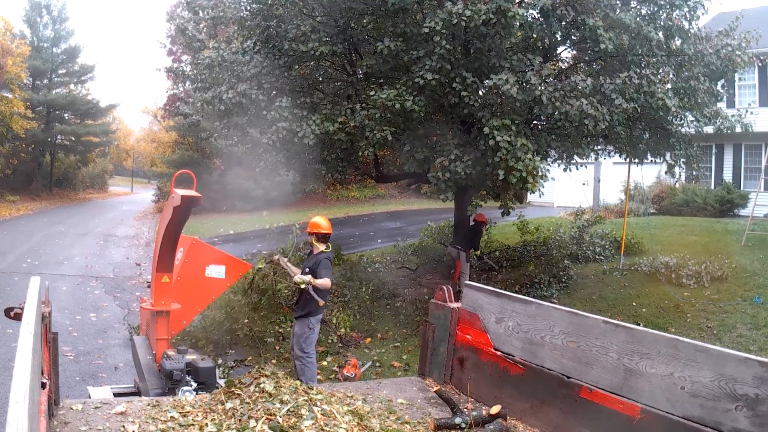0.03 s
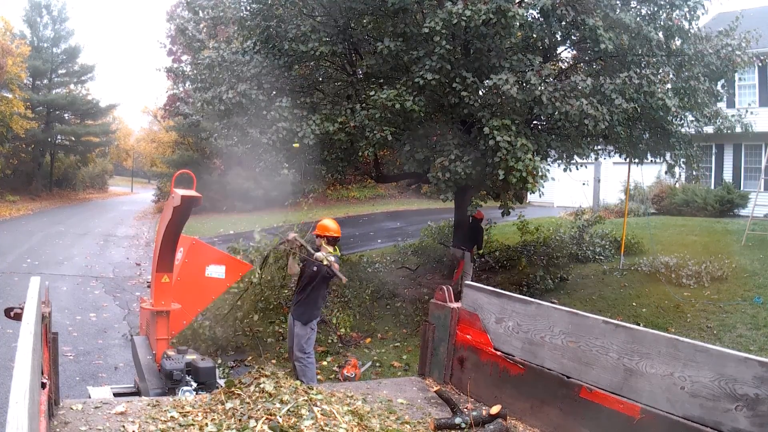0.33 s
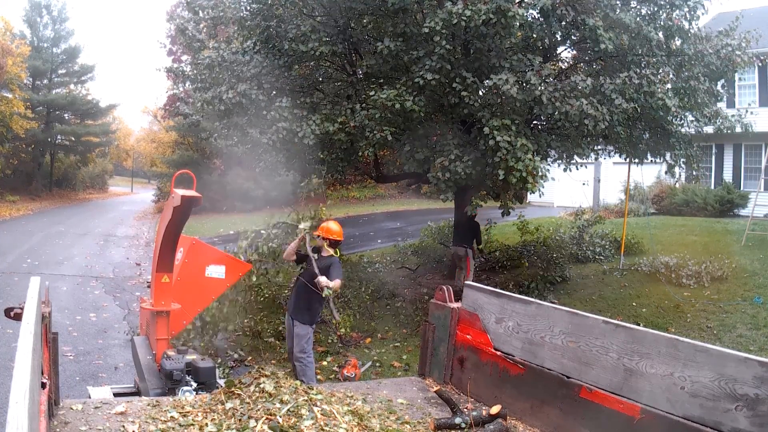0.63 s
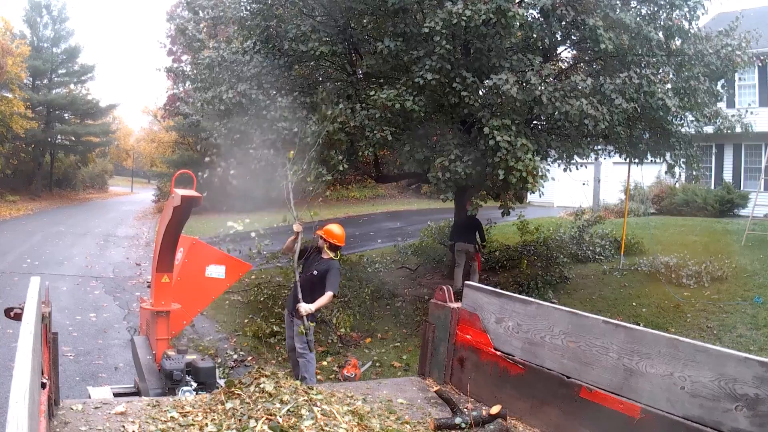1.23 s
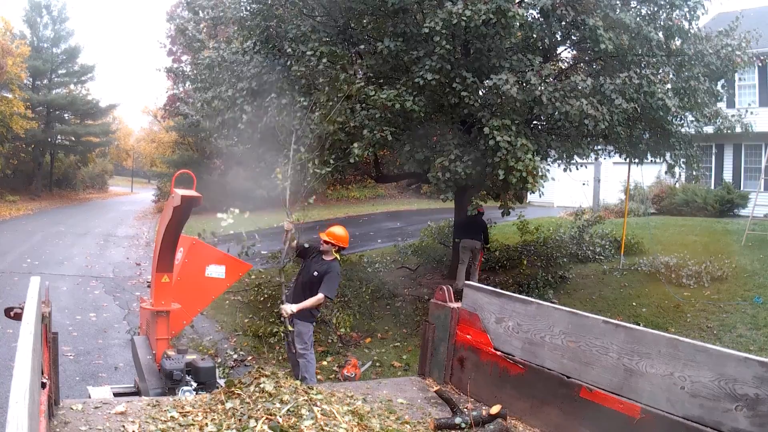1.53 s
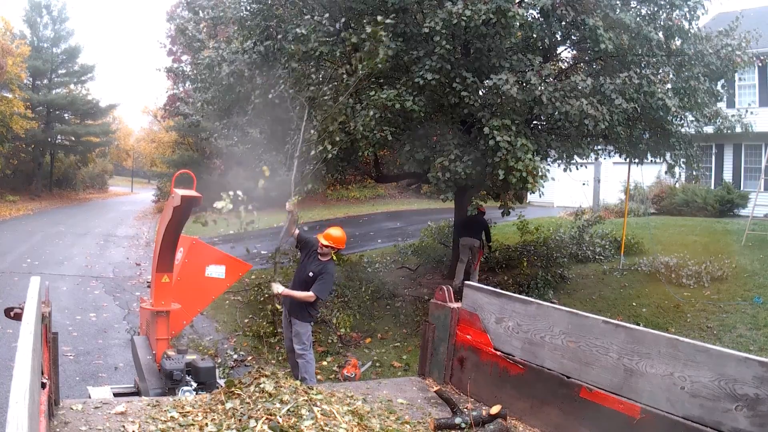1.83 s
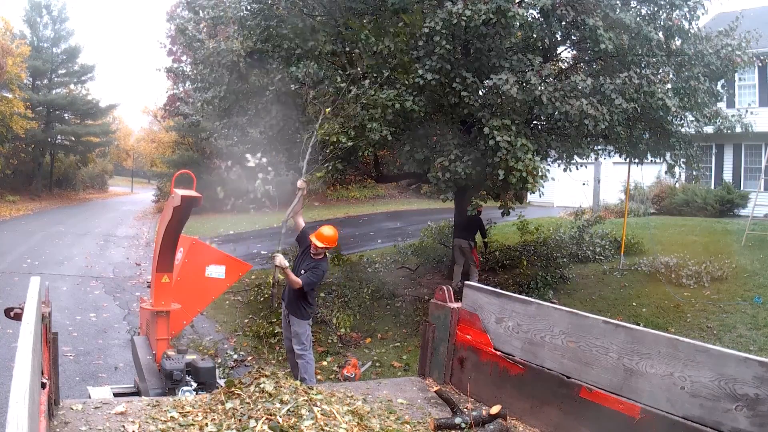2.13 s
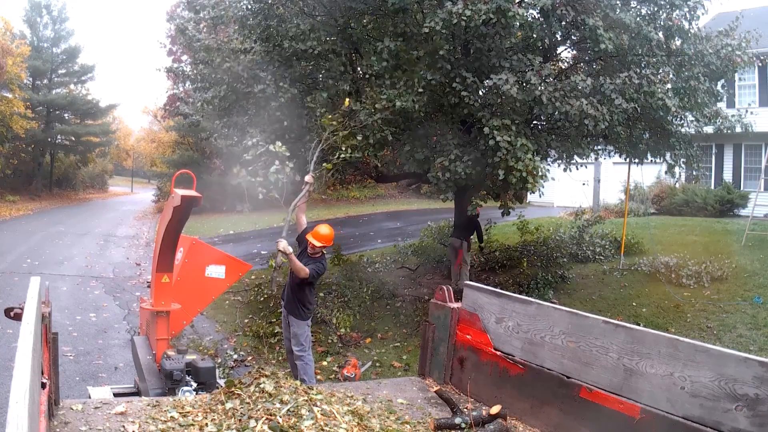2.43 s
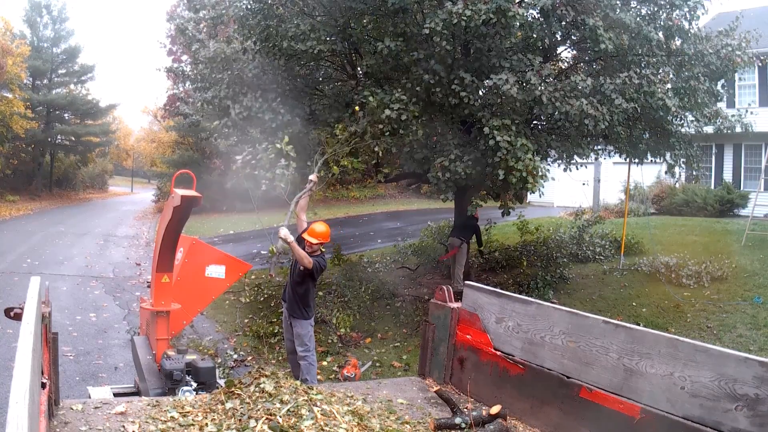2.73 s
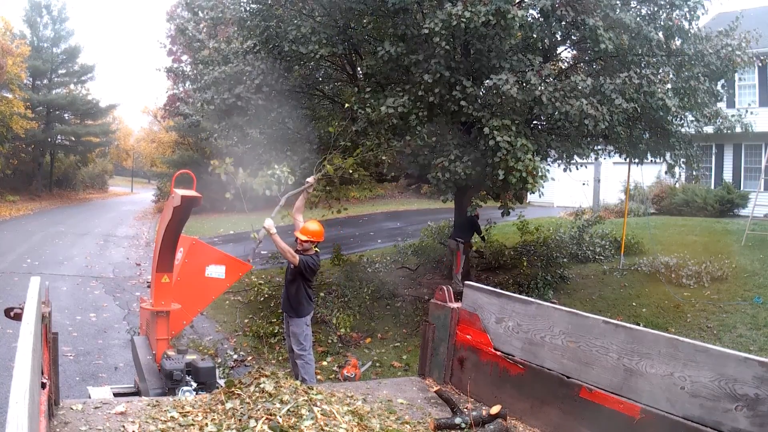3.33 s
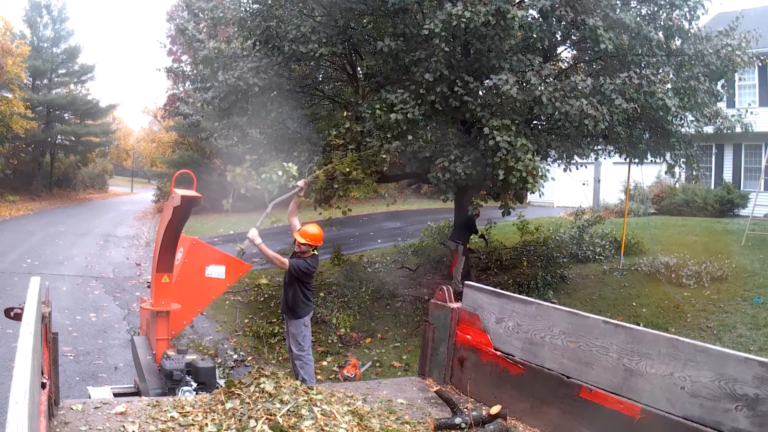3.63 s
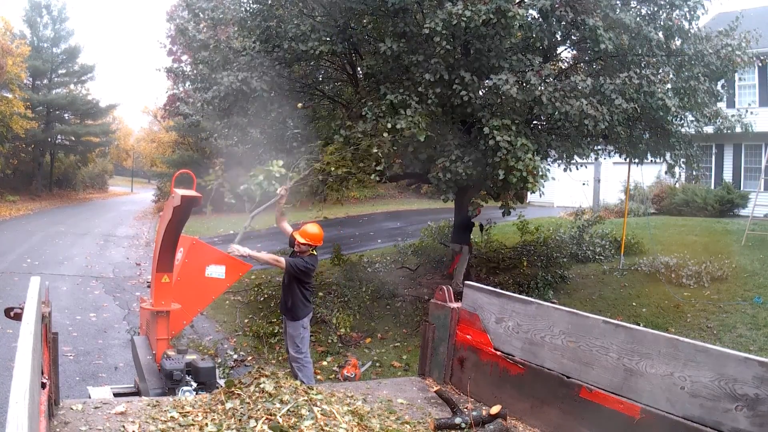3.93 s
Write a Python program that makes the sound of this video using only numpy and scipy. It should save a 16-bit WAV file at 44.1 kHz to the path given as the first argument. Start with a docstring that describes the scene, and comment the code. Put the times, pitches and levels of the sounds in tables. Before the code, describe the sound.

Loud, distorted wood chipper running outdoors, with an even droning tone and engine clatter beneath.

```python
"""A wood chipper's belt-driven rotor drones like a siren, unloaded, a few metres away outdoors.
Its vanes chop the air into tones and blow a roar through the chute. Underneath, the single-cylinder
petrol engine thuds and clatters at governed speed. The sound overloads the microphone,
which clips hard and keeps only a narrow band."""
import sys
import numpy as np
from scipy import signal
from scipy.fft import rfft, irfft, next_fast_len
from scipy.io import wavfile
from scipy.ndimage import map_coordinates

SR = 44100
rng = np.random.default_rng(int(sys.argv[2]) if len(sys.argv) > 2 else 0)


def wav_record(signal):
    """Record a signal, one row per channel, as 16-bit PCM in the file named by sys.argv[1]."""
    frames = np.transpose(np.atleast_2d(signal))
    bounded = np.clip(frames, -1, 1)
    # unit amplitude maps onto the largest positive 16-bit level
    quanta = np.round(bounded * 32767).astype(np.int16)
    wavfile.write(sys.argv[1], SR, quanta)


N = 176400


def amp(db):
    """Decibels to gain."""
    return 10 ** (np.asarray(db) / 20)


def unit(x):
    """Scale to rms 1."""
    return x / np.sqrt(np.mean(x ** 2) + 1e-20)


def eq_gain(curve, hz):
    """Gain of a (freq_hz, level_db) curve, read along a log frequency axis."""
    freq_hz, level_db = np.transpose(curve)
    return amp(np.interp(np.log(hz + 1), np.log(freq_hz + 1), level_db))


def wobble(rate_hz):
    """Smooth random modulation through rate_hz points a second."""
    points = rng.standard_normal(int(N * rate_hz / SR) + 4)
    return map_coordinates(points, [np.arange(N) * rate_hz / SR])


def filtered(x, response):
    """Filter x by a gain given as a function of frequency."""
    size = next_fast_len(N + SR // 2)
    return irfft(rfft(x, size) * response(np.fft.rfftfreq(size, 1 / SR)), size)[:N]


def coloured(x, curve):
    """Shape x with an EQ curve, then scale to rms 1."""
    return unit(filtered(x, lambda hz: eq_gain(curve, hz)))


def tones(cycles, partials, waver_db, waver_hz):
    """Harmonics of a rotation, each wavering a little in level."""
    return np.sqrt(2) * sum(
        amp(level_db + waver_db * wobble(waver_hz)) * np.sin(2 * np.pi * round(harmonic) * cycles)
        for harmonic, level_db in partials)


def saturate(x, top, knee):
    """Round off the peaks as they near the top; a higher knee clips harder."""
    return x / (1 + np.abs(x / top) ** knee) ** (1 / knee)


def block_clatter(cycles, t60_s=.09):
    """Each crank turn knocks the engine block; the two turns of a cycle ring differently."""
    knock_at = np.flatnonzero(np.diff(np.floor(2 * cycles)))
    strength = amp(1.8 * rng.standard_normal(N))
    t = np.arange(SR // 8) / SR
    clatter = np.zeros(N)
    for stroke in (knock_at[::2], knock_at[1::2]):
        knocks = np.bincount(stroke, strength[stroke], N)
        ring = rng.standard_normal(len(t)) * amp(-60 * t / t60_s)
        clatter += signal.fftconvolve(knocks, ring)[:N]
    return clatter


def engine(cycles):
    """Each firing drives the exhaust tones and a puff of gas, over the rattle of the block."""
    # exhaust tones on the firing rate: harmonic, level_db
    exhaust_partials = [(1, -15.5), (2, -13), (3, -27.5), (4, -19.5), (7, -26), (8, -22), (9, -20.2),
                        (10, -18.5), (12, -26.5), (19, -29), (26, -27.0)]
    # colour of the puffs and clatter: freq_hz, level_db
    block_eq = [(100, -26), (300, 0.5), (500, -1.5), (800, -1.5), (1100, -0.5), (1500, -4), (2200, -14),
                (4000, -25.5)]
    exhaust = tones(cycles, exhaust_partials, waver_db=1, waver_hz=12)
    puff_envelope = np.exp(-3.5 * (cycles % 1))
    puffs = unit(puff_envelope * coloured(rng.standard_normal(N), block_eq))
    clatter = coloured(block_clatter(cycles), block_eq)
    return exhaust + amp(-14) * puffs + amp(-14.5) * clatter


def chute_air():
    """Air blown through the chute roars, its level wavering slightly."""
    # colour of the roar: freq_hz, level_db
    chute_eq = [(20, -4.5), (80, -0.5), (105, -4), (150, 5), (200, 5), (250, 1), (420, -5.5), (650, 0),
                (1050, 1), (1280, -8.5), (1550, -1.5), (1800, -10.5), (2500, -19), (4000, -23.5),
                (6000, -61)]
    roar = coloured(rng.standard_normal(N), chute_eq)
    return amp(-8.5 + .3 * wobble(6.5)) * roar


def rotor(turns, vane_count=4):
    """The vanes chop the air at the housing's outlet like a siren; the overtones waver most."""
    # siren tones on the vane-passing rate: harmonic, level_db
    vane_partials = [(1, -2.5), (2, -13.5), (3, -26.5), (4, -15), (5, -19.5), (6, -7.5), (8, -31.5),
                     (9, -26.5), (10, -25), (11, -30), (12, -33), (14, -37)]
    # throb of the rotor's unevenness, on the turn rate: harmonic, level_db
    throb_partials = [(3, -18), (9, -25), (13, -22.5)]
    drone = tones(vane_count * turns, vane_partials[:2], waver_db=.34, waver_hz=8)
    whine = tones(vane_count * turns, vane_partials[2:], waver_db=1, waver_hz=7.01)
    throb = tones(turns, throb_partials, waver_db=1.5, waver_hz=8)
    return drone + whine + throb


def scene():
    """The belt locks the engine's firings to the rotor's turns, at a nearly steady speed."""
    # governed rotor speed: time_s, turns_per_s
    speed_curve = [(0, 39.94), (.22, 39.87), (1.1, 39.91), (1.5, 39.88), (1.95, 39.93), (2.4, 39.87),
                   (3.25, 39.91), (3.7, 39.86), (4, 39.88)]
    flutter_depth, firings_per_turn = .0004, .7401
    speed = np.interp(np.arange(N) / SR, *np.transpose(speed_curve))
    speed *= 1 + flutter_depth * wobble(12)
    turns = np.cumsum(speed) / SR
    return (rotor(turns) + chute_air() + engine(firings_per_turn * turns))[None]


def record(dry):
    """The overloaded microphone flattens the peaks; faint hiss lies on top and the treble is cut off."""
    # colour of the hiss: freq_hz, level_db
    hiss_eq = [(100, -4.5), (400, -1), (1000, 0), (2000, -3.5), (3000, -7.5), (4000, -13.5)]
    # microphone response: freq_hz, gain_db
    mic_eq = [(20, 1.5), (3000, -1), (3500, -0.5), (3750, -1.5), (3950, -15.5)]
    rolloff_hz, cutoff_hz = 3570, 3984
    clipped = saturate(dry[0], top=.81, knee=3.3)
    hiss = amp(-21) * coloured(rng.standard_normal(N), hiss_eq)
    dulled = signal.sosfilt(signal.butter(6, rolloff_hz, fs=SR, output="sos"), clipped + hiss)
    voiced = filtered(dulled, lambda hz: eq_gain(mic_eq, hz))
    limited = saturate(voiced, top=.955, knee=24)
    return filtered(limited, lambda hz: hz < cutoff_hz)[None]


dry = scene()
out = record(dry)
wav_record(out)
```